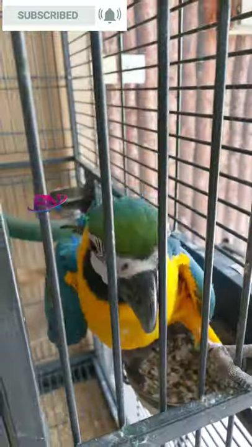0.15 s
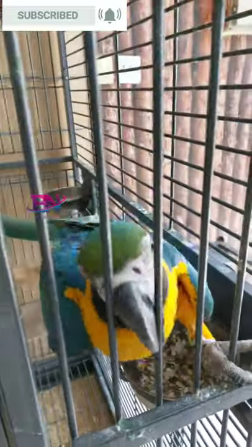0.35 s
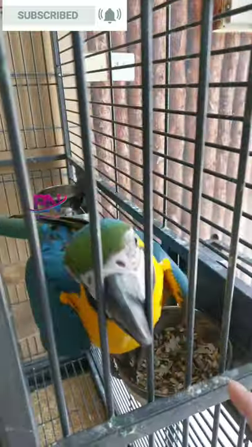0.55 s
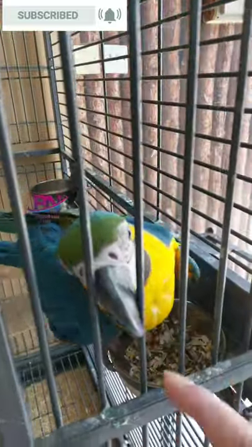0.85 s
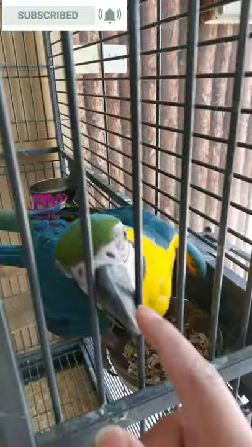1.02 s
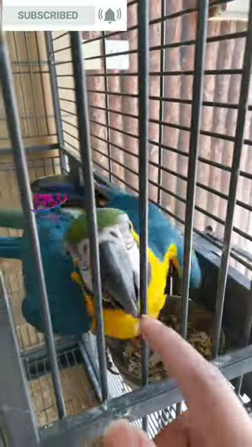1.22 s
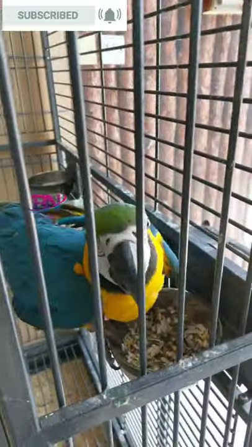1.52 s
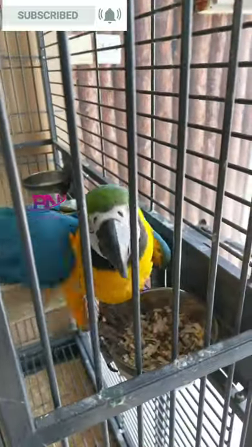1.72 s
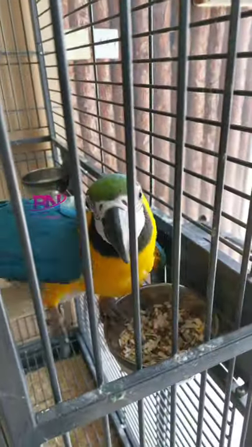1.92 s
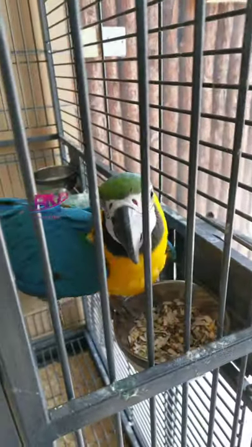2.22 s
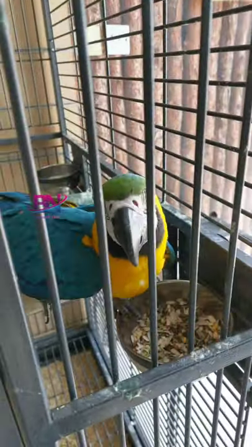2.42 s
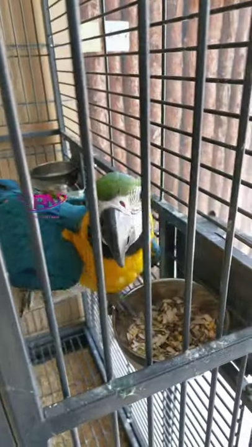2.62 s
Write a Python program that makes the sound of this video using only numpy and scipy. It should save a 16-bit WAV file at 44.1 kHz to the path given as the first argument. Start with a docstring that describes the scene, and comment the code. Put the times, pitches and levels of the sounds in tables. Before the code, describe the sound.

A large parrot squawks harshly in quick succession near the microphone, other birds calling farther off; feathers and claws rustle, echoes fade, two sharp clicks pop, then a rough screech returns over low distant traffic and faint hum.

```python
"""Parrots screech over one another in a hard-walled aviary, heard at the bars of a wire cage, over far traffic and a hum.
Each screech is a jittering stack of overtones, clean or ragged, over a breathy rasp gated once a cycle.
Among the screeches and in the pause after them, feathers, claws and cage ticks make grainy fading noise bursts.
Late in the pause come two sharp clicks: a noise crack, a low push and a hollow ring swooping up to pitch.
A last raspy screech follows. Shaped noise makes the traffic, a wavering sine the hum."""
import sys
import numpy as np
from scipy import signal
from scipy.fft import rfft, irfft, next_fast_len
from scipy.io import wavfile
from scipy.ndimage import map_coordinates

SR = 44100
rng = np.random.default_rng(int(sys.argv[2]) if len(sys.argv) > 2 else 0)


def digitize_waveform(pressure):
    """Quantize a signal to 16-bit integers and store it at the path in sys.argv[1].

    Rows of a 2-D input are taken as channels; values are limited to [-1, 1].
    """
    field = np.atleast_2d(pressure).T
    bounded = np.clip(field, -1, 1)
    quanta = np.round(bounded * 32767).astype(np.int16)
    wavfile.write(sys.argv[1], SR, quanta)


def linear_from_db(decibels):
    """Turn decibels (scalar or array-like) into linear amplitude factors; 0 gives 1."""
    return 10 ** (np.asarray(decibels, float) / 20)


N = 121275

# Course of each screech, one row per knot. Columns:
# start_s, pitch_hz, level_db, raggedness (0-1), rasp_db (re level), halfway_line_db (re level)
# already sounding at the start
GREETING = [(0, 1645, -28.5, 0.53, -8.5, -14), (.07, 1643, -30.5, 0.6, -7.5, -10.5),
            (.095, 1686, -19, 0.65, -18.5, -2), (.13, 1656, -33.5, 0.74, -5, 3.5),
            (.15, 1650, -51, 0.2, -18, -11.5)]
# first full screech, same columns
FIRST = [(.108, 1594, -39, 0.1, -29, -26), (.13, 1598, -19, 0.35, -19.5, -41.5),
         (.2, 1646, -22.5, 0.58, 1, -13.5), (.26, 1677, -23.5, 0.6, 1, -6), (.31, 1704, -42.5, 1, 11, -13),
         (.34, 1658, -23.5, 0.45, -8.5, -30), (.39, 1613, -31, 0.39, -24.5, -28),
         (.43, 1575, -45, 0.25, 2, -25)]
# cleaner screech, same columns
CLEAR = [(.425, 1820, -40, 0.068, -40.5, -29), (.472, 1924, -16.5, 0.2, -34, -51),
         (.495, 1898, -37.5, 0.35, -21, -39), (.525, 1884, -36, 0.35, -12, -26),
         (.63, 1900, -49, 0.55, -36, -36.5)]
# raspy screech, same columns
HOARSE = [(.633, 1946, -38.5, 0.92, 3.5, -30), (.72, 2010, -31, 0.25, -1.5, -31.5),
          (.78, 2017, -29.5, 0.8, 6, -34), (.88, 2016, -44.5, 1, -5.5, -35.5),
          (.895, 1843, -33.5, 0.29, -5, -29), (.925, 1852, -29, 1, -7.5, -30),
          (.975, 1894, -36.5, 0.31, -20, -30.5)]
# fourth screech, same columns
FOURTH = [(.905, 1790, -37.5, 0.53, -5.5, -1), (.945, 1620, -31, 0.85, -21, -10.5),
          (1.02, 1675, -25, 0.88, -10, -34), (1.06, 1670, -31, 1, -14, -2),
          (1.17, 1657, -43.5, 0.96, -16, -4.5)]
# screech sliding down, same columns
SLIDE = [(1.185, 1620, -23, 0.43, -25, -30), (1.225, 1596, -27.5, 0.57, -25, -25),
         (1.255, 1401, -31.5, 0.83, -13, -12), (1.33, 1329, -33, 0.99, -20, -32),
         (1.44, 1295, -60.5, 1, -29, -19)]
# screech after the pause, same columns
LAST = [(2.557, 1646, -46, 0.31, 7, -9), (2.59, 1600, -43.5, 0.58, 5, -10),
        (2.62, 1580, -35, 0.92, 1.2, -33), (2.68, 1627, -31, .9, -1.9, -29),
        (2.75, 1615, -28.5, 0.99, -2.5, -29)]
# far low call, falling after a short rise, same columns
FAR_FALL = [(.32, 495.8, -32, 0.7, -37, -52), (.39, 546.3, -33.5, 0.66, -12, -69),
            (.47, 518.4, -40.5, 0.85, -23.5, -48), (.53, 456, -40.5, 0.56, 1, -32),
            (.6, 402.5, -45.5, 0.63, -14, -21)]
# far whistle, same columns
FAR_WHISTLE = [(.975, 1310, -36, 0.31, -16, -43), (1.06, 1359, -46, 0.72, 12, -44),
               (1.13, 1460, -34, 0.91, -37.5, -58.5), (1.24, 1169, -52.5, 1, -18, -40)]
# far croak, same columns
FAR_CROAK = [(1.2, 999.4, -37.5, 0.7, 4, -43), (1.3, 981, -29.5, 0.97, -5.5, -7),
             (1.36, 964, -53, 0.82, -3, -19), (1.47, 946, -53, 0.55, -25, -13)]
# Voice of each screech: course, overtones_db (1, 2, 3..),
# beak resonance in the rasp (beak_hz, foot_octaves, lift_db, chest_db), wet_db,
# optional second, slower throat vibration (beat_hz at mean pitch, depth)
SCREECHES = [(GREETING, [-9.5, 0.5, 1.5, -18.5, -20.5], (3500, 5.5, 8, 12), -6.5, (470, 0.22)),
             (FIRST, [-28.5, -1, -3.5, -13.5, -23.5], (5280, 0.11, 19.5, 0.77), -7.5, (370, 0.25)),
             (CLEAR, [-7.5, -0.5, -11, -27.5, -27.5, -34], (5300, -16, 13, -7.5), 0, (460, 0.12)),
             (HOARSE, [-6, 5, -12, -17], (4875.5, 1.87, 17.5, 11), -5, (330, 0.36)),
             (FOURTH, [-31, 2.5, 2, -12.5, -19, -21, -35, -23.5], (4000.5, .9, 6.5, -20.5),
             0.5, (200, 0.55)), (SLIDE, [-16, 1.5, -12, -21, -48, -24.5], (2900, 18, 21, 0), -5),
             (LAST, [-13.5, -0.5, 0.5, -30, -7.5, -20, -8.5], (2250, 0.28, 4.3, 26.5), -4, (550, 0.89)),
             (FAR_FALL, [-34, -43, -3, -2.5, -18, -6, -26, -10.5], (1201, -4, 31, -23), 0, (120, 0.64)),
             (FAR_WHISTLE, [0, -6.5], (1709, 2, 20.5, -30), 0), (FAR_CROAK, [-37, -0.5, -19.5],
             (2088, 2.5, 26.5, -2), 0, (280, 1))]
# Breath colour: frequency_hz, gain_db
RASP_COLOUR = [(400, -42), (800, -18), (1400, -6), (2400, -1), (4500, 1), (6000, -6), (9000, -5),
               (12500, -13), (15000, -24.5)]
# Hollow clicks: ring_start_s, ring_db, push_db, push_s, under_pitch (0-1, how far below pitch the ring starts)
CLICKS = [(2.1475, -10.5, -11.5, 0.00037, 0.71), (2.4418, -15, -19, 0.002, 0.54)]
# Colour of the click's crack: frequency_hz, gain_db
CRACK_COLOUR = [(1200, -16.5), (2000, 7), (5000, -5.5), (11000, -4.5), (15500, -1)]
# Scuffs and ticks: start_s, level_db, t60_s, bright_share (0-1)
SCUFFS = [(0.533, -35, 0.062, 1), (0.608, -37.5, 0.074, 1), (1.333, -31, .15, 0.2),
          (1.378, -27, 0.073, 0.5), (1.394, -33.5, 0.14, 0.1), (1.817, -40.5, 0.31, 0.2),
          (1.9547, -49, .2, 0.1), (2.049, -44.5, 0.41, 0.3), (2.074, -48.5, 0.52, 0), ]
# Dull scuff colour: frequency_hz, gain_db
DULL_COLOUR = [(1000, 1), (1800, 7), (3000, -1), (5500, -2), (7500, -15.5), (10000, -20)]
# Bright scuff and click lead-in colour: frequency_hz, gain_db
BRIGHT_COLOUR = [(7000, -19), (9000, 1), (12000, -2), (15000, -10.5)]
# Traffic rumble colour: frequency_hz, gain_db
TRAFFIC_COLOUR = [(20, -9), (101, -2), (190, -12), (408, -14), (638, -21), (892, -24), (3220, -37.5),
                  (7000, -46.5), (15800, -44.5)]
# Traffic rumble level: time_s, level_db
TRAFFIC_LEVEL = [(0.0, -50), (2.75, -46.5)]
# Aviary decay: frequency_hz, t60_s
AVIARY_DECAY = [(300, 0.4), (2000, 0.59), (5000, 0.39), (12000, 0.19)]
# Left-right difference: frequency_hz, gain_db
SIDE_COLOUR = [(3000, -77), (6000, -29.5), (10000, -22.5), (14000, -10)]
# Microphone response: frequency_hz, gain_db
MIC_RESPONSE = [(20, -21), (40, -2), (14500, 0), (15600, -6.5), (16100, -29.5)]


def unit(x):
    """Scales to rms 1."""
    return x / np.sqrt(np.mean(x ** 2) + 1e-20)


def along(points, hz):
    """Interpolates (Hz, value) points on a log frequency axis."""
    point_hz, value = np.transpose(points)
    return np.interp(np.log(hz + 1), np.log(point_hz + 1), value)


def wobble(knots_per_s, size):
    """Smooth random curve through normal-distributed knots."""
    knots = rng.standard_normal(size // 8 + 4)
    return map_coordinates(knots, [np.arange(size) * knots_per_s / SR], mode="mirror")


def coloured(x, spectrum):
    """Filters x by (Hz, dB) points."""
    size = next_fast_len(len(x) + 4096)
    gain = linear_from_db(along(spectrum, np.fft.rfftfreq(size, 1 / SR)))
    return irfft(rfft(x, size) * gain, size)[:len(x)]


def room(x):
    """Aviary reverberation: delayed noise tail, each frequency dying at its own speed."""
    hz, t, z = signal.stft(rng.standard_normal(SR), SR, nperseg=256)
    decay = linear_from_db(-60 * t / along(AVIARY_DECAY, hz)[:, None])
    tail = signal.istft(z * decay, SR, nperseg=256)[1]
    delayed = np.pad(x, (250, 0))  # samples
    return signal.fftconvolve(delayed, tail / np.linalg.norm(tail))[:N]


def screech(course, overtones_db, beak, wet_db, beat=(0, 0)):
    """Jittering overtones that shred into noise bands, a line halfway between the first two, and gated rasp."""
    jitter, jitter_knots_per_s = 0.0204, 400  # share of pitch at full raggedness
    drift, drift_knots_per_s = 0.00664, 40.05  # share of pitch
    shred_width = 0.12  # noise knot rate over overtone frequency
    rasp_gate_depth, rasp_grain_db, grain_knots_per_s = 0.6, 1.5, 250
    edge_s = 0.0066

    knot_s, *columns = np.transpose(course)
    start, out = max(round(knot_s[0] * SR), 0), np.zeros(N)
    t = np.arange(start, N)[:SR // 2] / SR
    n = len(t)
    pitch_hz, level_db, ragged, rasp_db, halfway_db = [np.interp(t, knot_s, c) for c in columns]
    ragged = np.clip(ragged, 0, 1)
    mean_hz = np.mean(columns[0])

    unrest = jitter * ragged * wobble(jitter_knots_per_s, n) + drift * wobble(drift_knots_per_s, n)
    phase = 2 * np.pi * np.cumsum(pitch_hz * (1 + unrest)) / SR

    def shred(number):
        """Overtone amplitude: steady if clean, random if ragged."""
        return np.sqrt(1 - ragged ** 2) + ragged * wobble(shred_width * number * mean_hz, n)

    tone = np.zeros(n)
    for number, gain_db in enumerate(overtones_db, 1):
        tone += linear_from_db(gain_db) * shred(number) * np.sin(number * phase)
    beat_hz, beat_depth = beat
    tone *= 1 + beat_depth * np.cos(phase * beat_hz / mean_hz)
    tone += linear_from_db(halfway_db) * shred(1) * np.sin(3 * phase / 2)

    gate = 1 + rasp_gate_depth * np.cos(phase)
    breath = rng.standard_normal(n) * gate * linear_from_db(rasp_grain_db * wobble(grain_knots_per_s, n))
    beak_hz, foot_octaves, lift_db, chest_db = beak
    mouth = [(beak_hz / 2 ** (2 + foot_octaves), chest_db),  # two octaves below the lower foot
             (beak_hz / 2 ** foot_octaves, 0),
             (beak_hz, lift_db),
             (beak_hz * 2 ** foot_octaves, 0)]
    rasp = linear_from_db(rasp_db) * unit(coloured(coloured(breath, RASP_COLOUR), mouth))

    fade_in = np.clip((t - knot_s[0]) / edge_s + (start == 0), 0, 1)  # none at time 0
    fade_out = np.clip((knot_s[-1] - t) / edge_s + 1, 0, 1)
    out[start:start + n] = linear_from_db(level_db) * fade_in * fade_out * (tone + rasp)
    return out + linear_from_db(wet_db) * room(out)


def clicks():
    """Hissy lead-in, crack, low push and hollow ring swooping up to pitch; a near surface slaps it back."""
    ring_hz, ring_peak_s, swoop_s = 2540, 0.0012, 0.0006
    crack_db, burst_s, lead_s, lead_db = -10, 0.0024, 0.0062, -41  # dB re ring
    slap_s, slap_db, wet_db = 0.0068, -20, -26
    out, t = np.zeros(N), np.arange(SR // 20) / SR

    def burst(level_db, at_s, colour):
        """Noise under a bell-shaped envelope."""
        noise = unit(coloured(rng.standard_normal(len(t)), colour))
        return linear_from_db(level_db) * np.exp(-((t - at_s) / burst_s) ** 2) * noise

    for ring_start_s, ring_db, push_db, push_s, under_pitch in CLICKS:
        u = np.maximum(t - 2 * lead_s, 0)  # s since ring start
        turns = ring_hz * (u - under_pitch * swoop_s * (1 - np.exp(-u / swoop_s)))
        envelope = (u / ring_peak_s * np.exp(1 - u / ring_peak_s)) ** 2
        ring = np.sin(2 * np.pi * turns) * envelope
        push = -(u / push_s) * (2 - u / push_s) * np.exp(-u / push_s)
        crack = burst(crack_db, 2 * lead_s + burst_s / 2, CRACK_COLOUR)
        lead_in = burst(lead_db, lead_s, BRIGHT_COLOUR)
        first = round((ring_start_s - 2 * lead_s) * SR)
        out[first:][:len(t)] += linear_from_db(ring_db) * (ring + crack + lead_in) + linear_from_db(push_db) * push
    slap = linear_from_db(slap_db) * np.roll(out, round(slap_s * SR))
    return out + slap + linear_from_db(wet_db) * room(out)


def scuffs():
    """Feathers and claws on wire and perch, cage ticks: grainy noise that starts fast and fades."""
    rise_s, grain_db, grain_knots_per_s, wet_db = 0.0024, 3, 200, -4.5
    out, t = np.zeros(N + SR), np.arange(SR // 3) / SR
    for start_s, level_db, t60_s, bright_share in SCUFFS:
        dull = unit(coloured(rng.standard_normal(len(t)), DULL_COLOUR))
        bright = unit(coloured(rng.standard_normal(len(t)), BRIGHT_COLOUR))
        share = np.clip(bright_share, 0, 1)
        decay = linear_from_db(level_db - 60 * t / t60_s + grain_db * wobble(grain_knots_per_s, len(t)))
        shape = decay * (1 - np.exp(-t / rise_s))
        out[round(start_s * SR):][:len(t)] += shape * (np.sqrt(1 - share) * dull + np.sqrt(share) * bright)
    dry_scuffs = out[:N]
    return dry_scuffs + linear_from_db(wet_db) * room(dry_scuffs)


def background():
    """Far traffic as swelling low noise, with a hum wavering in level and phase."""
    swell_db, swell_knots_per_s = 1.8, 6
    hum_hz, hum_db = 103, -66.5
    t = np.arange(N) / SR
    level_db = np.interp(t, *np.transpose(TRAFFIC_LEVEL)) + swell_db * wobble(swell_knots_per_s, N)
    rumble = unit(coloured(rng.standard_normal(N), TRAFFIC_COLOUR)) * linear_from_db(level_db)
    hum_level = linear_from_db(hum_db + 1.5 * wobble(9.9, N))
    hum = hum_level * np.sin(2 * np.pi * hum_hz * t + 0.27 * wobble(7.7, N))
    return rumble + hum


def scene():
    """Sums all sources at one spot, the same in both channels."""
    parrots = sum(screech(*voice) for voice in SCREECHES)
    mix = parrots + clicks() + scuffs() + background()
    return np.array([mix, mix])


def top_cut(x):
    """Nothing passes above the cut-off."""
    return signal.sosfilt(signal.butter(12, 15970, fs=SR, output="sos"), x)


def record(dry):
    """Mono microphone response, then a faint, mostly treble left-right difference of wandering level."""
    mid = coloured(dry[0], MIC_RESPONSE)
    smear = rng.standard_normal(128)
    smeared = signal.fftconvolve(mid, smear / np.linalg.norm(smear))[:N]
    side = coloured(smeared, SIDE_COLOUR) * linear_from_db(7.1 * wobble(9.28, N))
    return top_cut(np.array([mid + side, mid - side]))


dry = scene()
out = record(dry)
digitize_waveform(out)
```